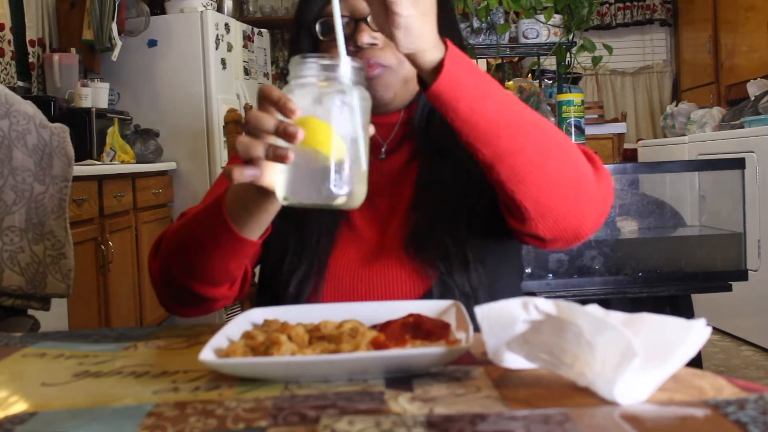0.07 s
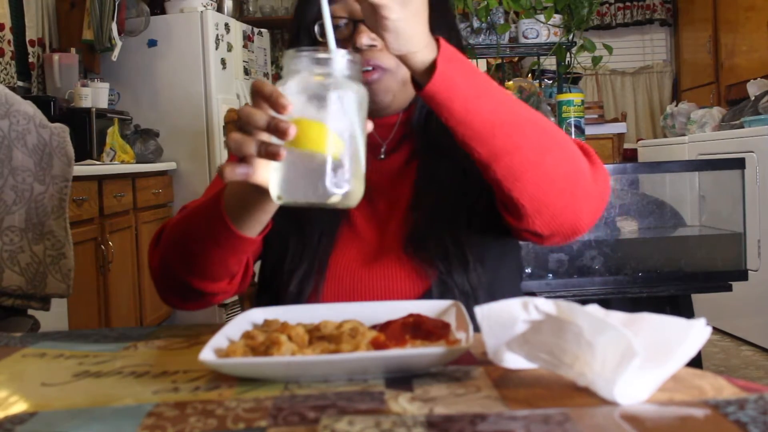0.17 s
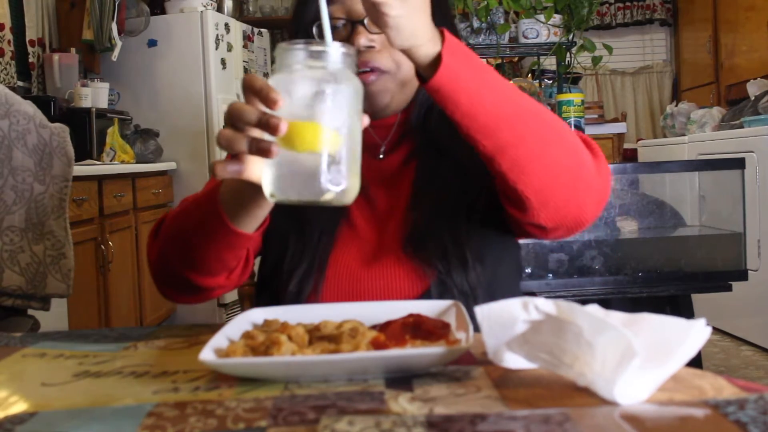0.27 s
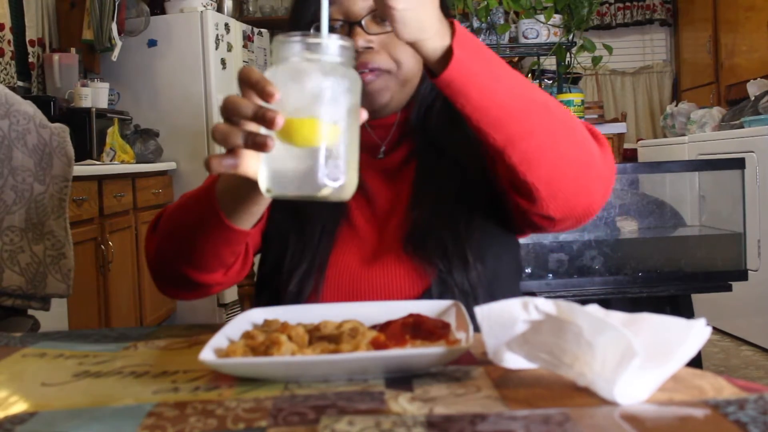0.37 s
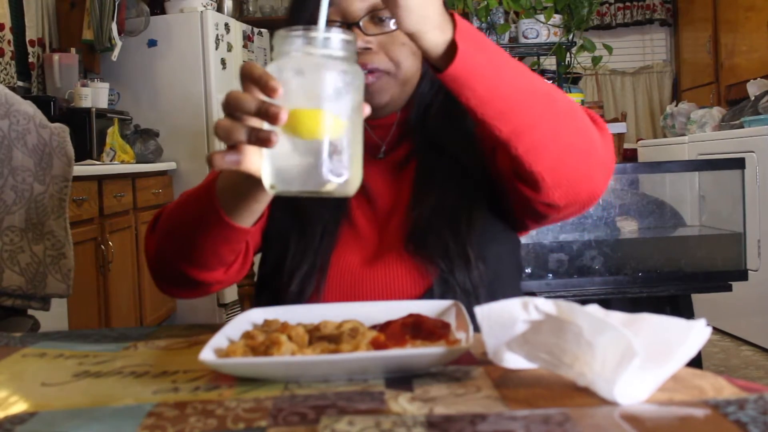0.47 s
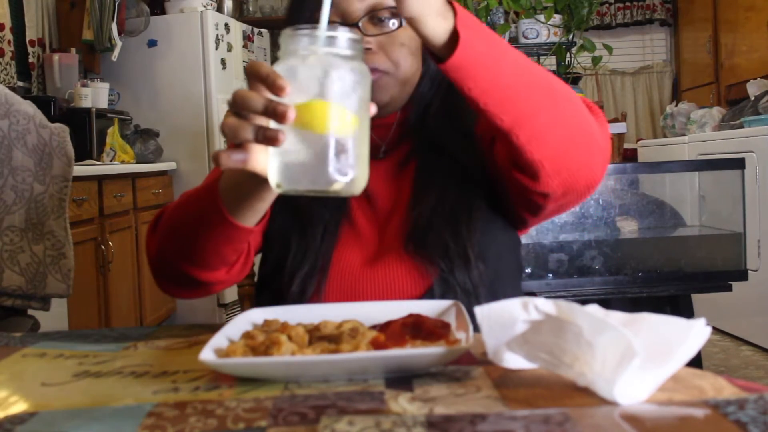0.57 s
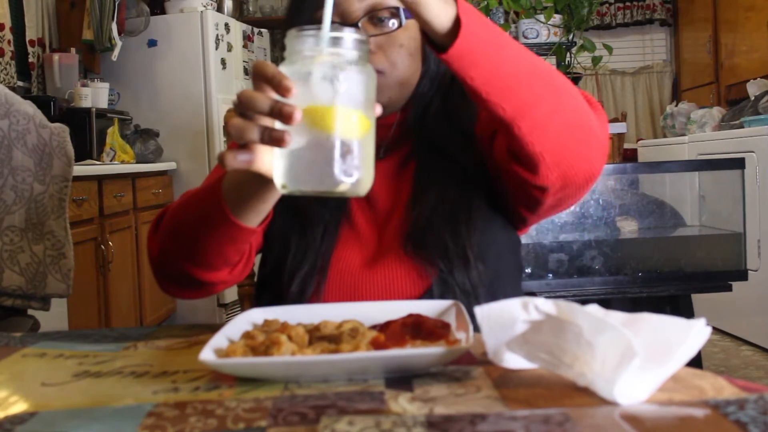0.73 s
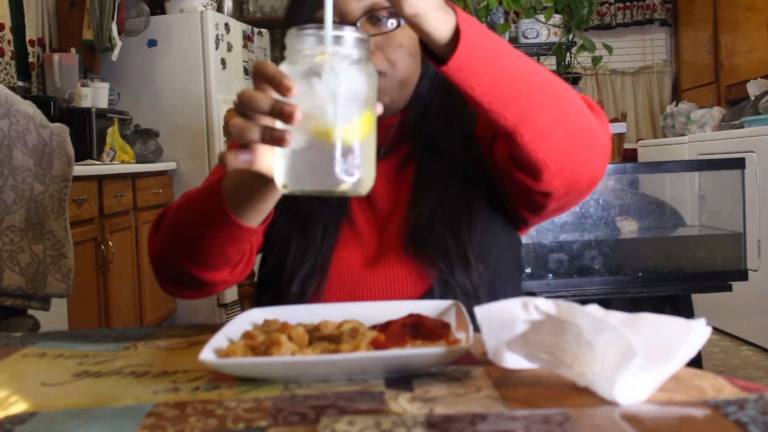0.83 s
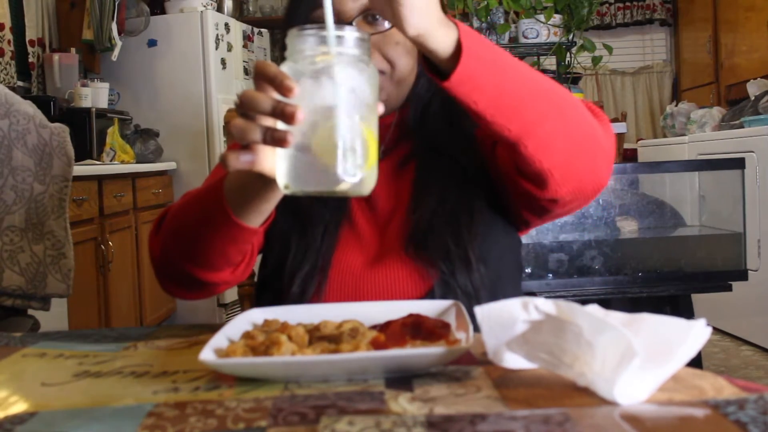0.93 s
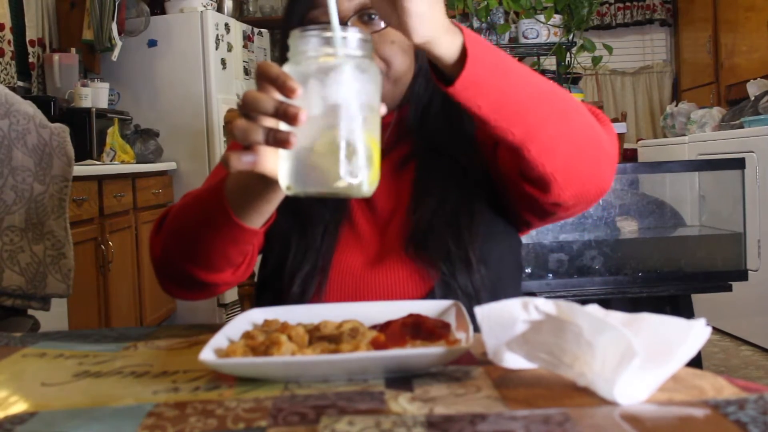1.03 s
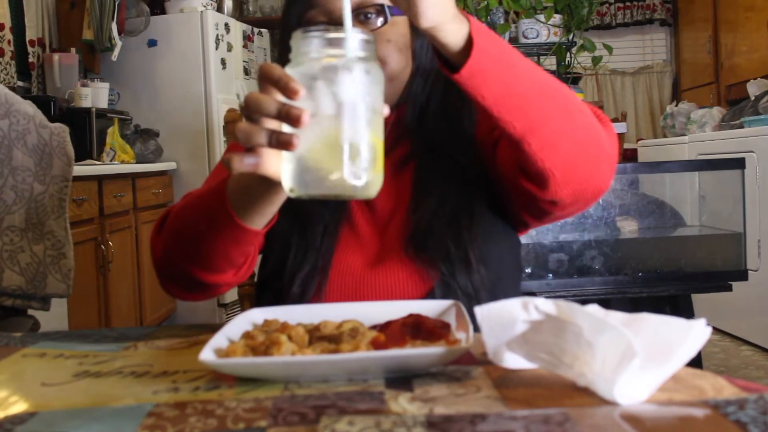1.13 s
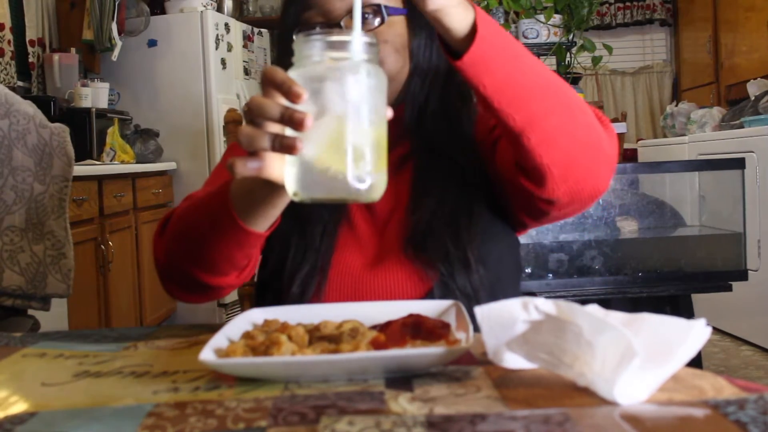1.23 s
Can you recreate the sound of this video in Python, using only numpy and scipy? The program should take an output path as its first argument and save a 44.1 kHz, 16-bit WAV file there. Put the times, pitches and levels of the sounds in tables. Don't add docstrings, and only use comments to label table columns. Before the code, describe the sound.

Rapid stirring of ice in a glass jar of water: dense damped clinks and fine rattle, a few hard snaps, thinning at the end over faint room air and hiss, heard at arm's length indoors.

```python
import sys
import numpy as np
from scipy import signal
from scipy.fft import irfft
from scipy.io import wavfile

SR = 44100
rng = np.random.default_rng(int(sys.argv[2]) if len(sys.argv) > 2 else 0)


def generate_wav(signal):
    frames = np.transpose(np.atleast_2d(signal))
    scaled = np.clip(frames, -1, 1) * 32767
    pcm = np.round(scaled).astype(np.int16)
    wavfile.write(sys.argv[1], SR, pcm)


def gain_from_decibels(decibels):
    exponent = np.asarray(decibels, float) / 20
    return 10 ** exponent


N = 57330

# start in seconds, then belly, wall, shoulder and rim levels in dB.
FIRST_STROKE = [(0.0493, -42.5, -47, -48.5, -65), (0.0788, -43, -49, -51.5, -54.5),
                (0.0884, -43, -54, -48.5, -43.5), (0.1548, -48, -44.5, -56, -66),
                (0.1606, -43, -46, -47, -59), (0.1838, -38.5, -52, -46, -46), (0.2081, -43, -39, -45, -53),
                (0.2172, -38, -48, -41, -32), (0.2209, -35.5, -32, -40, -36), (0.2558, -49, -35, -52, -47),
                (0.2666, -52, -49, -58, -43), (0.2921, -38, -36, -34, -34), (0.305, -37, -57, -46, -48),
                (0.3245, -35, -35, -53, -46), (0.3338, -36, -40, -48, -60), (0.3405, -43, -46, -47, -42),
                (0.3544, -47, -54, -55, -49), (0.3792, -39.5, -56, -54, -55), (0.3975, -64, -50, -59, -63),
                (0.4134, -47, -44, -42, -50)]
SECOND_STROKE = [(0.4205, -42, -34, -51, -47), (0.4268, -39, -36, -47, -42), (0.4495, -40, -48, -49, -56),
                 (0.4697, -41.5, -49, -53, -47), (0.4904, -52, -55, -52, -68), (0.523, -46, -51, -55, -52),
                 (0.5292, -46, -45.5, -46.5, -54), (0.5538, -36.5, -36, -44, -57),
                 (0.566, -41, -50, -47, -58), (0.5746, -34.5, -32.5, -56, -51),
                 (0.6148, -44.5, -64, -51, -63), (0.6289, -46, -49, -54, -51),
                 (0.6435, -42.5, -54, -48, -52), (0.6498, -51, -54, -44.5, -47),
                 (0.6772, -36.5, -47, -46, -54), (0.6817, -39, -52, -65, -43), (0.7008, -38, -42, -42, -40),
                 (0.727, -38, -46, -44, -50), (0.7406, -42, -47, -56, -56)]
THIRD_STROKE = [(0.7814, -43, -54, -47, -44), (0.7961, -39.5, -61, -44, -45), (0.8124, -53, -39, -41, -39),
                (0.8304, -40, -38, -30, -30), (0.8476, -36.5, -46, -35, -36), (0.8556, -41, -48, -37, -44),
                (0.878, -49, -44, -40, -46), (0.9033, -35.5, -45, -44, -45), (0.9273, -44, -46, -40, -48),
                (0.9374, -44, -42, -42, -44), (0.9476, -42, -55, -45, -46), (0.9588, -34.5, -37, -36, -54),
                (0.9705, -43, -46, -44, -48), (0.984, -47.5, -34.5, -48, -58),
                (1.0182, -45.5, -43, -52, -61), (1.053, -39.5, -40, -41.5, -56),
                (1.0716, -41, -40.5, -56, -52), (1.082, -43, -44.5, -43.5, -47),
                (1.1191, -42, -53, -66, -55), (1.155, -51, -53, -59, -65), (1.1782, -52, -52, -49.5, -61),
                (1.2221, -41, -43.5, -41, -41)]
# start in seconds, then belly, wall, shoulder and
# rim levels in dB.
FURTHER_STRIKES = [(.1795, -50, -48, -48, -55), (.2395, -46, -45, -52, -55), (.3115, -44, -50, -44, -50),
                   (.331, -46, -42, -50, -52), (.4595, -46, -54, -48, -56), (.5405, -46, -56, -50, -58),
                   (.5845, -48, -54, -52, -58), (.591, -47, -50, -52, -58), (.609, -54, -50, -49, -58)]

# frequency in Hz, level in dB, 60 dB decay in seconds.
BELLY_MODES = [(1900, -2, .02), (2070, 0, .017), (2240, -3, .014)]
WALL_MODES = [(2770, 0, .017), (3050, -5, .011)]
SHOULDER_MODES = [(3430, 0, .022), (3620, -5, .014), (3980, -5, .012)]
RIM_MODES = [(4230, -4, .011), (4520, 0, .012), (5050, -5, .011), (5560, -5, .011), (6400, -10, .01),
             (7850, -18, .01)]

# start in seconds, level in dB, frequency in Hz.
CUBE_KNOCKS = [(0.45, -46, 1340), (0.497, -47, 1200), (0.521, -46, 1110), (0.677, -35, 1150),
               (0.7893, -40, 1230), (0.818, -41.5, 1060), (0.9012, -38.5, 1220), (0.9377, -41, 1300)]
# start in seconds, level in dB, frequency in Hz.
HAND_KNOCKS = [(.186, -40, 536), (.196, -44, 720), (.205, -46, 637), (.217, -41, 590), (1.13, -44, 263),
               (1.25, -40.5, 362)]
# start in seconds, level in dB, frequency in Hz.
CORNER_CATCHES = [(.184, -36, 3780), (.184, -44, 6300), (.2083, -36, 2280), (.2675, -35, 2200),
                  (.2675, -38, 2610), (.268, -42, 5300), (.3055, -32, 3860), (.3545, -37, 4700),
                  (.4138, -29, 3150), (.4138, -33, 4370), (.4908, -39, 3600), (.554, -39, 3920),
                  (.629, -46, 7200), (.6772, -34, 3660), (.6815, -38, 5710), (.6815, -43, 7200),
                  (.7816, -42, 5450), (.847, -37, 9300)]
# start in seconds, level in dB, frequency in Hz, 60 dB decay in seconds.
BLOW_MODES = [(.2922, -14, 2830, .009), (.2922, -14, 4300, .006), (.2923, -25, 2160, .009),
              (.2922, -18, 5150, .004), (.2922, -23, 6200, .004), (.2924, -37, 9500, .008),
              (.2955, -27, 1970, .02), (.2955, -35, 3240, .012), (.7008, -23, 2050, .018),
              (.7009, -24, 3030, .011), (.7008, -26, 3660, .015), (.7009, -23, 4600, .011),
              (.7008, -35, 5200, .01), (.7272, -27, 3570, .02), (.7272, -31, 2890, .014),
              (.831, -13, 3580, .011), (.8312, -17, 3450, .024), (.8308, -20, 2150, .012),
              (.8306, -20, 4520, .011), (.8306, -25, 5650, .012), (.8304, -23, 9300, .009),
              (.8304, -27, 7880, .009), (.8535, -30, 3420, .03), (.878, -27, 3450, .028),
              (.9277, -21, 3420, .017), (.9285, -31, 1880, .022), (.9374, -23, 5080, .011),
              (.9376, -23, 3400, .02), (.9374, -24, 2720, .017), (.9374, -29, 2190, .014),
              (.97, -27, 3990, .013), (.971, -27, 3360, .018), (.97, -34, 5350, .01)]
# start in seconds, crack and tick levels in dB.
SNAPS = [(.2921, -25, -39), (.7009, -28, -43), (.7272, -35, -54), (.8304, -24, -31), (.9274, -32, -51),
         (.9374, -31, -45)]

# time in seconds, rattle level in dB.
STIRRING = [(0, -59), (.13, -65), (.2, -53.5), (.5, -58), (.65, -54), (.82, -53), (.845, -48), (.91, -53),
            (1.0, -54.5), (1.1, -73), (1.3, -84)]
RATTLE_MIX_DB = [4, 3, -3, 0, -4]

# frequency in Hz, 60 dB decay in seconds.
ROOM_T60 = [(500, .3), (3000, .28), (6000, .24), (10000, .2)]
# frequency in Hz, density in dB per Hz.
AIR_COLOUR = [(20, -47), (30, -6), (62, -3.5), (200, -8.5), (400, -7), (800, -15), (3800, -21),
              (16000, -25.5)]
# frequency in Hz, likeness from 0 to 1.
AIR_LIKENESS = [(60, 0.9), (1000, 0.89), (5000, 0.88), (12000, 0.13)]
# frequency in Hz, rms level in dB, width in Hz.
HUM_LINES = [(60, -74, 5), (192, -68, 26)]
# time in seconds, level in dB.
SWAY_SWELL = [(0, -54), (.95, -54), (1.1, -46), (1.3, -45)]

CUBE_T60 = 0.02
RISE_S, SNAP_RISE_S = 0.0005, 0.0003


def evened(x):
    return x / np.sqrt(np.mean(x ** 2) + 1e-20)


def read(points, hz):
    f, value = np.transpose(points)
    return np.interp(np.log(hz + 1), np.log(f + 1), value)


def along(points):
    s, db = np.transpose(points)
    return gain_from_decibels(np.interp(np.arange(N) / SR, s, db))


def add(mix, s, sound):
    part = mix[round(s * SR):][:len(sound)]
    part += sound[:len(part)]


def ring(hz, db, t60, turn=0., rise=RISE_S):
    t = np.arange(SR // 8) / SR
    fade = gain_from_decibels(-60 * t / t60) + gain_from_decibels(-26 - 60 * t / (3 * t60))
    start = 1 - np.exp(-(t / rise) ** 2)
    return gain_from_decibels(db) * fade * start * np.sin(2 * np.pi * (hz * t + turn))


def crack_band(noise):
    return signal.sosfilt(signal.butter(2, [1600, 6500], "bandpass", fs=SR, output="sos"), noise)


def tick_band(noise):
    return signal.sosfilt(signal.butter(2, 7000, "highpass", fs=SR, output="sos"), noise)


def air():
    air_db, sway_hz, sway_start = -55.5, 10.1, 0.64
    hz, t = np.fft.rfftfreq(N, 1 / SR), np.arange(N) / SR
    a, b, c, d = rng.standard_normal((4, len(hz)))
    alike = np.clip(read(AIR_LIKENESS, hz), 0, 1)
    mid = (a + 1j * b) * np.sqrt(1 + alike)
    side = (c + 1j * d) * np.sqrt(1 - alike)
    wash = evened(irfft(np.array([mid + side, mid - side]) * gain_from_decibels(read(AIR_COLOUR, hz)), N))
    hum = np.zeros(N)
    for line_hz, db, width_hz in HUM_LINES:
        peak = 1 + ((hz - line_hz) * 2 / width_hz) ** 2
        hum += gain_from_decibels(db) * evened(irfft((b + 1j * a) / peak, N))
    sway = along(SWAY_SWELL) * np.sqrt(2) * np.sin(2 * np.pi * (sway_hz * t + sway_start))
    return gain_from_decibels(air_db) * wash + hum + sway


def room(x):
    likeness = 0.85
    taps = np.zeros((2, SR // 2))
    slots = np.arange(200, SR // 2 - 20, 20)
    at = slots + rng.integers(0, 20, (2, len(slots)))
    np.put_along_axis(taps, at, rng.choice([-1., 1.], at.shape), 1)
    hz, t, z = signal.stft(taps, SR, nperseg=256)
    fade = gain_from_decibels(-60 * t / read(ROOM_T60, hz)[:, None])
    mid, side = signal.istft(z * fade, SR, nperseg=256)[1]
    share = np.sqrt((1 - likeness) / (1 + likeness))
    tail = np.array([mid + share * side, mid - share * side]) / np.linalg.norm(mid)
    return signal.fftconvolve(x[None], tail, axes=1)[:, :N]


def rattle():
    touches_per_s, spread_db, shorter = 1800, 3., 0.8
    size = gain_from_decibels(spread_db * np.minimum(rng.exponential(1, N), 3))
    size *= rng.random(N) < touches_per_s / SR
    ice = [(hz, 0, CUBE_T60) for hz in (936, 1180, 1330, 1570)]
    families = (BELLY_MODES, WALL_MODES, SHOULDER_MODES, RIM_MODES, ice)
    modes = []
    for family, mix_db in zip(families, RATTLE_MIX_DB):
        modes += [(hz, db + mix_db, shorter * t60) for hz, db, t60 in family]
    which = rng.integers(0, len(modes), N)
    out = np.zeros(N)
    for k, mode in enumerate(modes):
        out += signal.oaconvolve(size * (which == k), ring(*mode))[:N]
    return along(STIRRING) * evened(out)


def knocks():
    out = np.zeros(N)
    kinds = ((CUBE_KNOCKS, CUBE_T60, .001), (HAND_KNOCKS, .045, .005), (CORNER_CATCHES, .01, .0005))
    for rows, t60, rise in kinds:
        for s, db, hz in rows:
            add(out, s, ring(hz, db, t60, rise=rise))
    for s, db, hz, t60 in BLOW_MODES:
        add(out, s, ring(hz, db, t60, rise=SNAP_RISE_S))
    return out


def snaps():
    crack_t60, haze_db, haze_t60 = 0.01, -21, 0.16
    out, t = np.zeros(N), np.arange(SR // 8) / SR
    fade = gain_from_decibels(-60 * t / crack_t60) + gain_from_decibels(haze_db - 60 * t / haze_t60)
    fade *= np.minimum(t / SNAP_RISE_S, 1)
    for s, crack_db, tick_db in SNAPS:
        crack, tick = rng.standard_normal((2, len(t))) * fade
        add(out, s, gain_from_decibels(crack_db) * crack_band(crack) + gain_from_decibels(tick_db) * tick_band(tick))
    return out


def strikes():
    strike_db, mix_spread_db, detune = 6.5, 4., 0.011
    hard_db, soft_rise_s = -30, 0.0009
    crack_db, crack_t60, tick_db, tick_t60 = -7, 0.01, -13.5, 0.013
    families = (BELLY_MODES, WALL_MODES, SHOULDER_MODES, RIM_MODES)
    out, t = np.zeros(N), np.arange(600) / SR
    for s, *levels in FIRST_STROKE + SECOND_STROKE + THIRD_STROKE + FURTHER_STRIKES:
        rise = RISE_S if max(levels) > hard_db else soft_rise_s
        for modes, level_db in zip(families, levels):
            luck = rng.uniform(-1, 1, (len(modes), 3))
            mix_db = np.array([db for _, db, _ in modes]) + mix_spread_db * luck[:, 0]
            mix_db += strike_db + level_db - 10 * np.log10(np.sum(gain_from_decibels(2 * mix_db)))
            for (hz, _, t60), db, d in zip(modes, mix_db, luck):
                add(out, s, ring(hz * (1 + detune * d[1]), db, t60, .5 * (d[2] > 0), rise))
        tick_fade = gain_from_decibels(levels[3] + tick_db - 60 * t / tick_t60)
        add(out, s, tick_band(rng.standard_normal(600)) * tick_fade)
        crack_fade = gain_from_decibels(strike_db + max(levels) + crack_db - 60 * t / crack_t60) * np.minimum(t / rise, 1)
        add(out, s, crack_band(rng.standard_normal(600) * crack_fade))
    return out


def scene():
    gap_s, room_db = 0.000003, -14.5
    jar = strikes() + knocks() + rattle() + snaps()
    lag = gap_s * SR / 2 * np.gradient(jar)
    return np.array([jar - lag, jar + lag]) + gain_from_decibels(room_db) * room(jar) + air()


def roll_off(x):
    return signal.sosfilt(signal.butter(12, 16780, fs=SR, output="sos"), x)


def record(dry):
    edge = signal.firwin(101, 16000, fs=SR)
    mix = signal.oaconvolve(dry, edge[None], "same")
    return roll_off(mix)


dry = scene()
out = record(dry)
generate_wav(out)
```